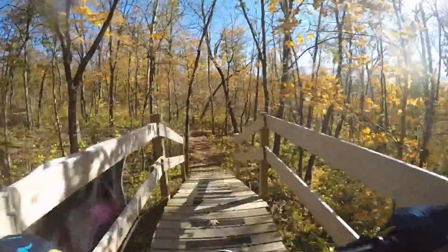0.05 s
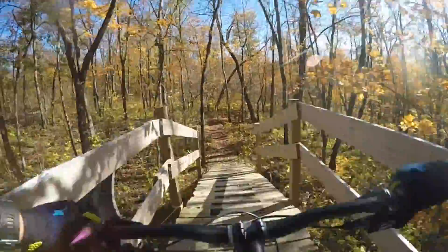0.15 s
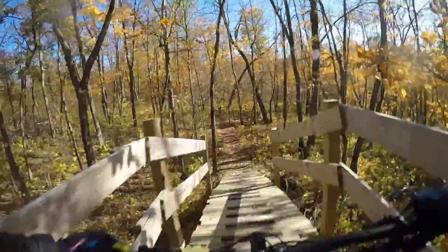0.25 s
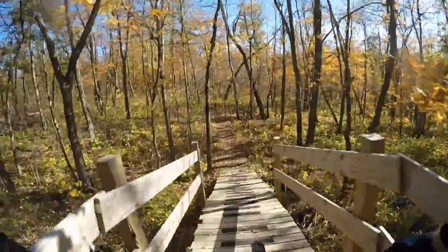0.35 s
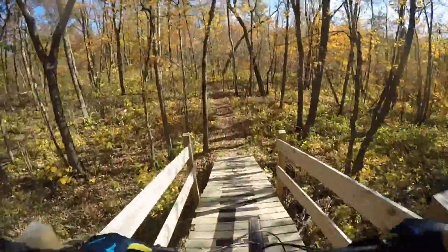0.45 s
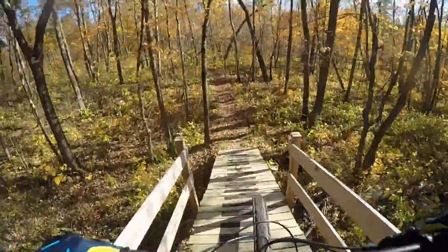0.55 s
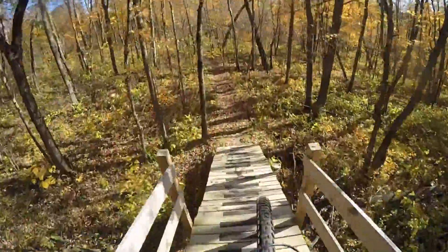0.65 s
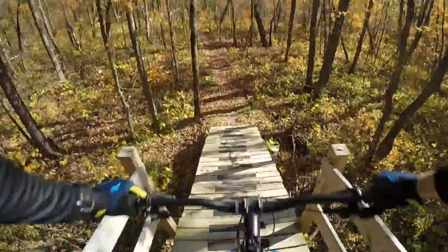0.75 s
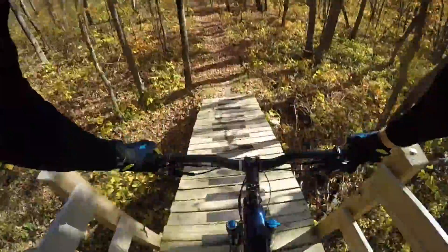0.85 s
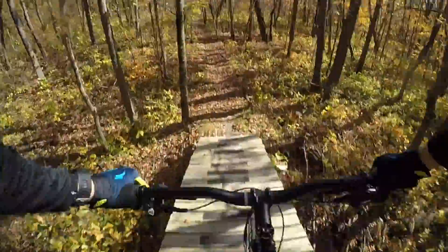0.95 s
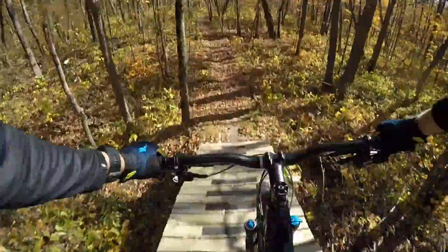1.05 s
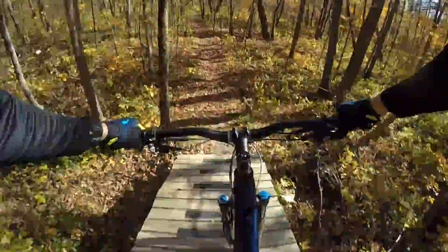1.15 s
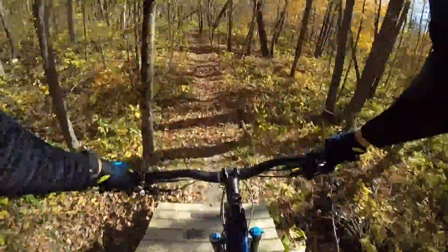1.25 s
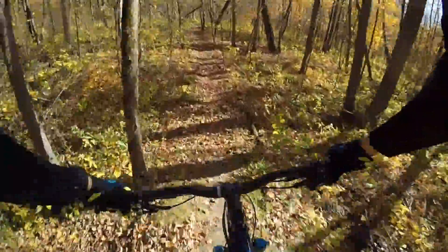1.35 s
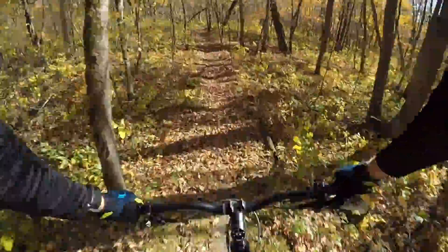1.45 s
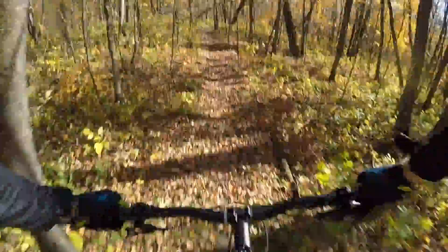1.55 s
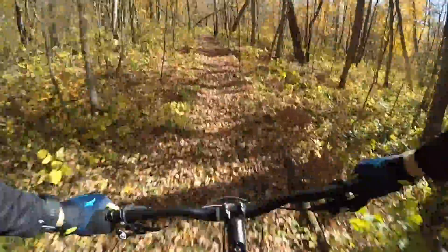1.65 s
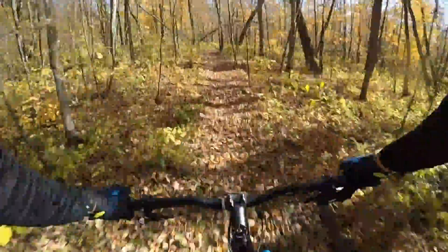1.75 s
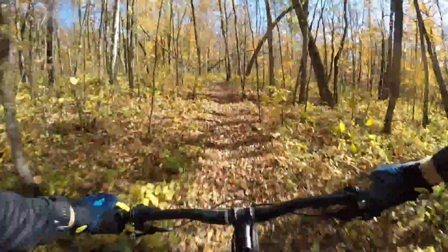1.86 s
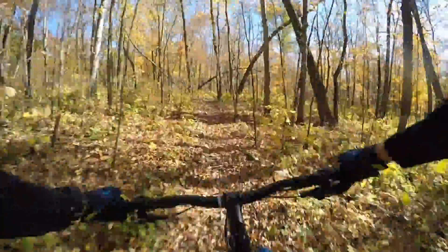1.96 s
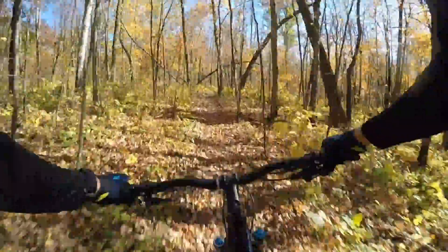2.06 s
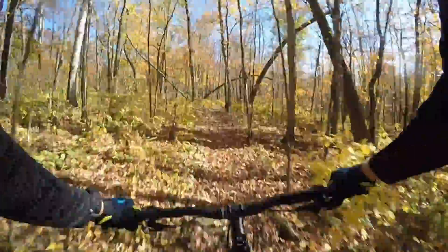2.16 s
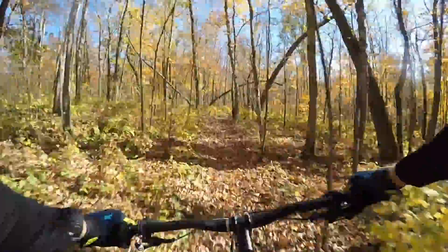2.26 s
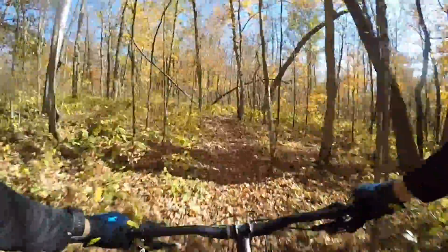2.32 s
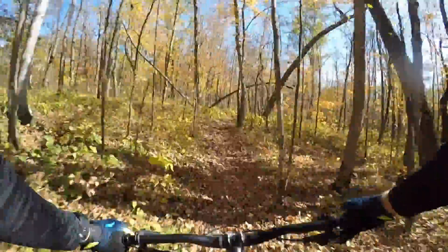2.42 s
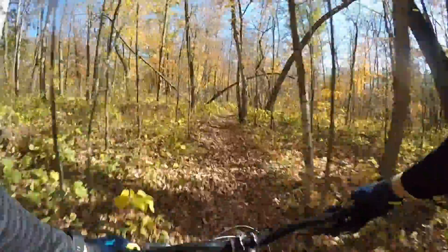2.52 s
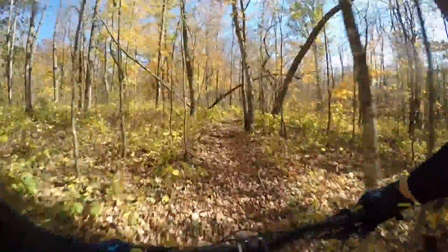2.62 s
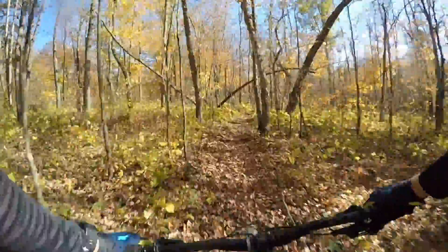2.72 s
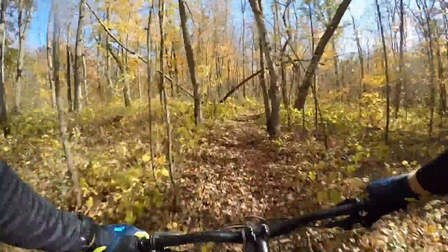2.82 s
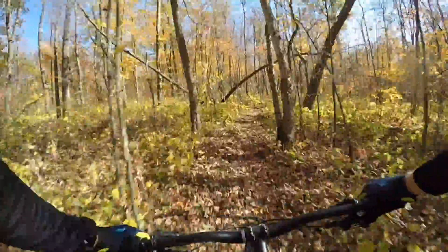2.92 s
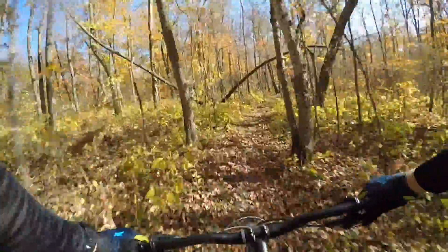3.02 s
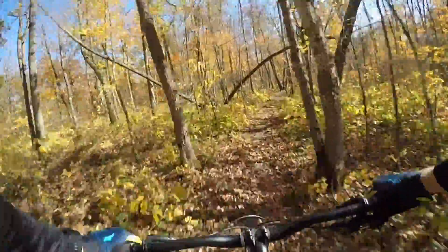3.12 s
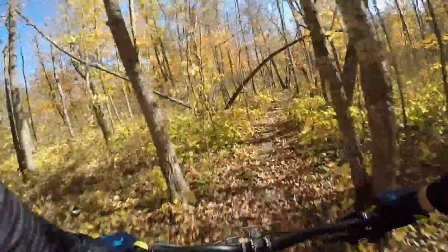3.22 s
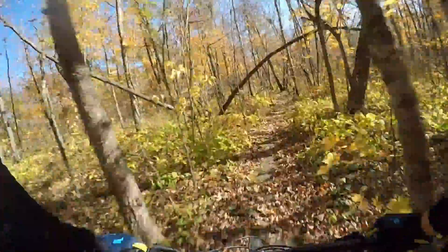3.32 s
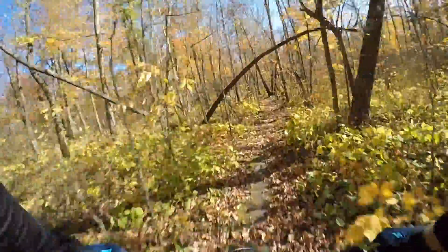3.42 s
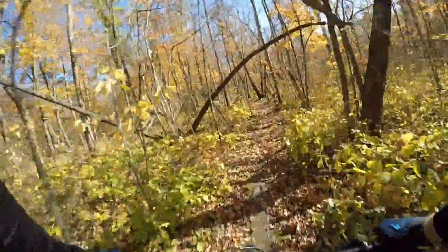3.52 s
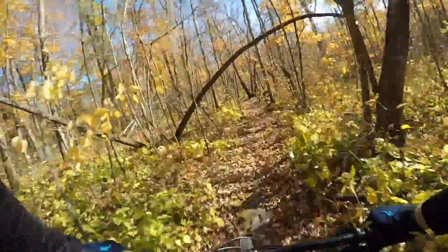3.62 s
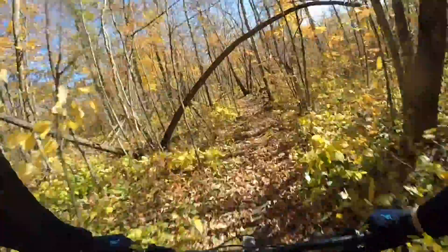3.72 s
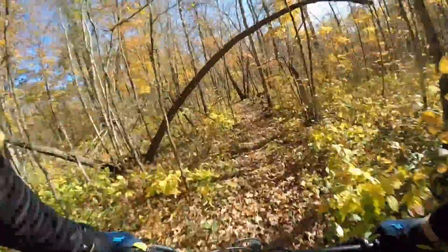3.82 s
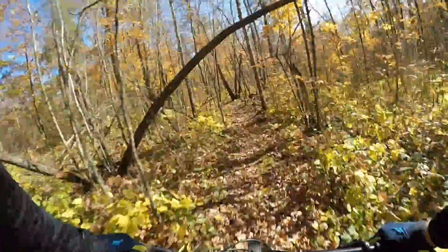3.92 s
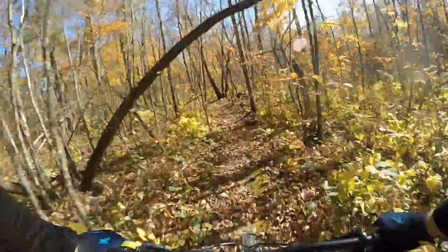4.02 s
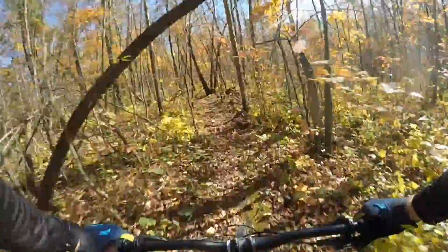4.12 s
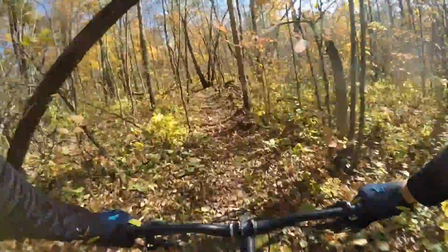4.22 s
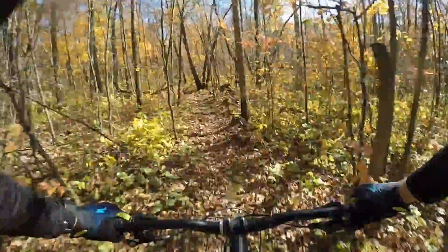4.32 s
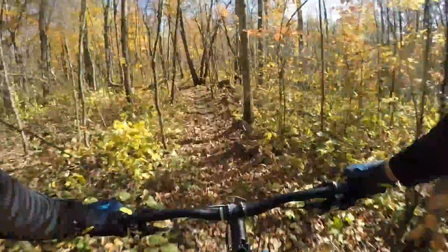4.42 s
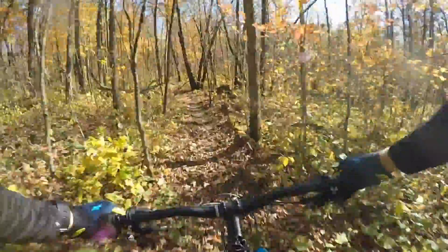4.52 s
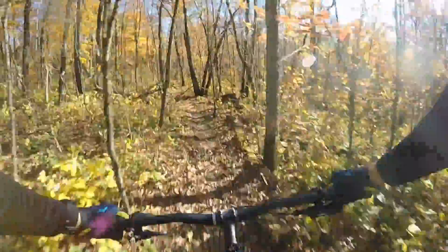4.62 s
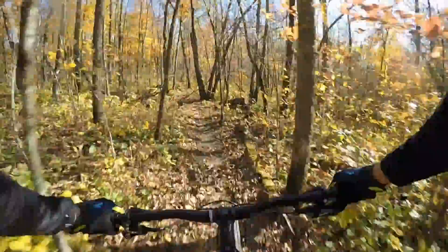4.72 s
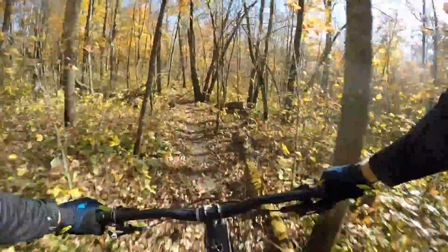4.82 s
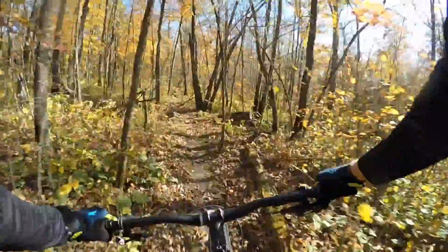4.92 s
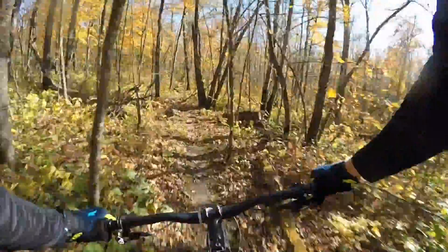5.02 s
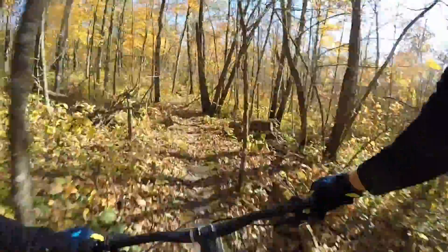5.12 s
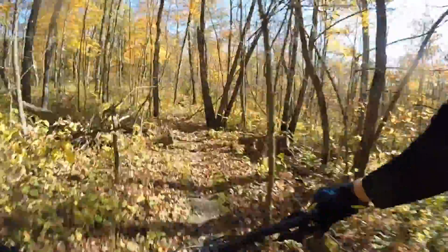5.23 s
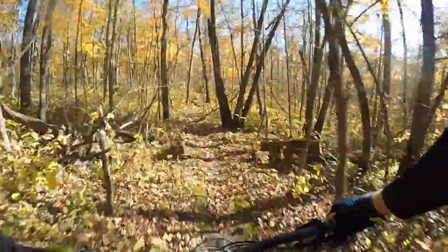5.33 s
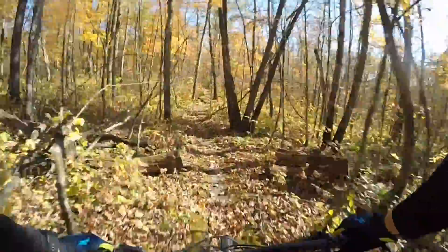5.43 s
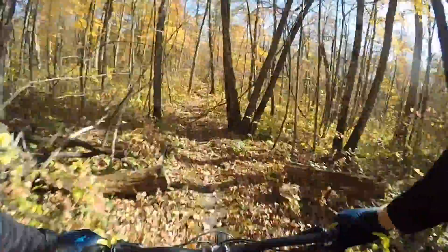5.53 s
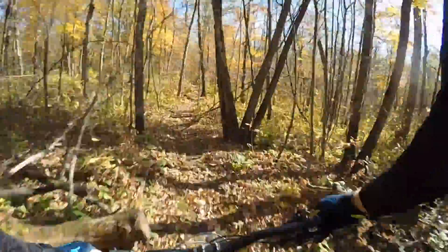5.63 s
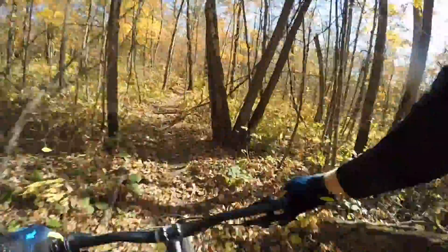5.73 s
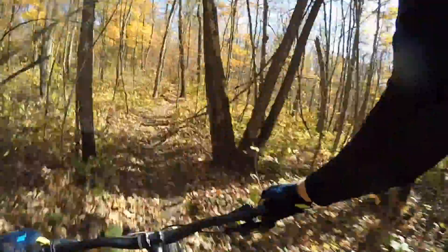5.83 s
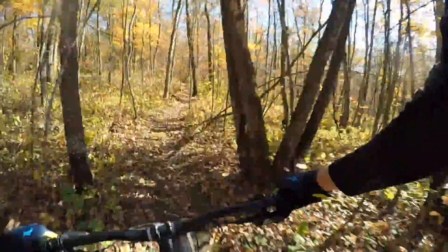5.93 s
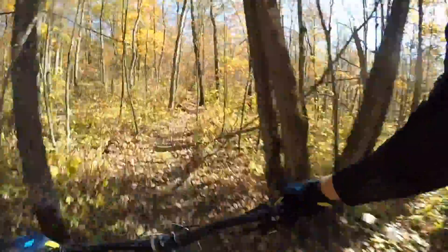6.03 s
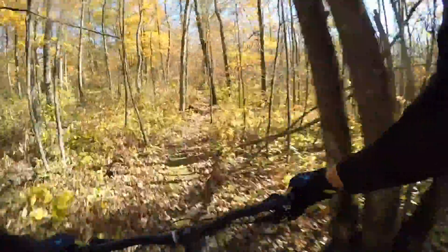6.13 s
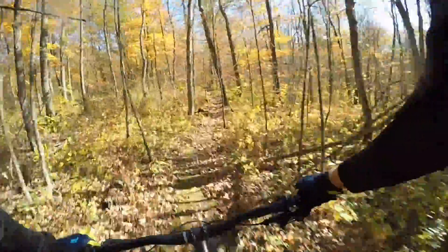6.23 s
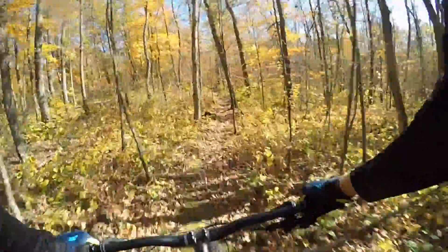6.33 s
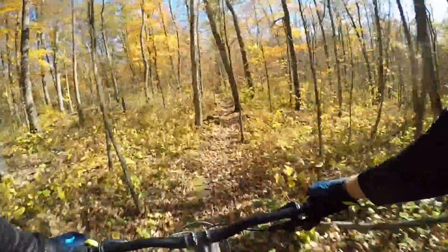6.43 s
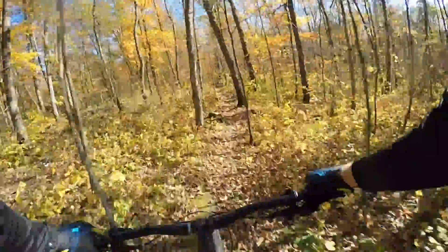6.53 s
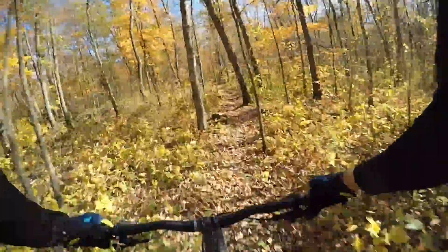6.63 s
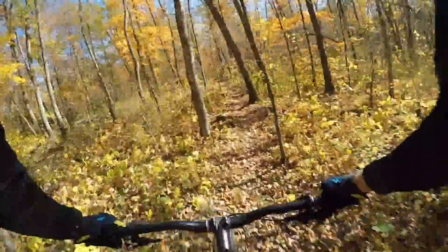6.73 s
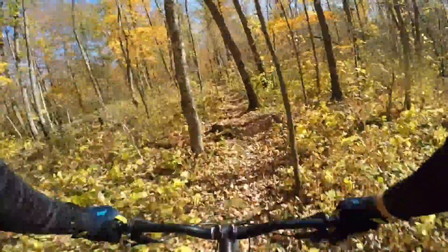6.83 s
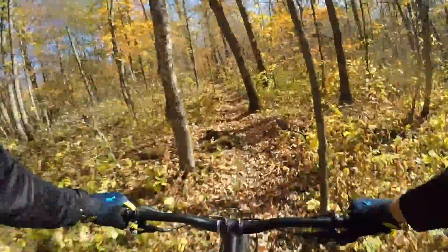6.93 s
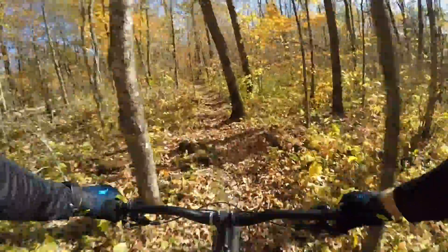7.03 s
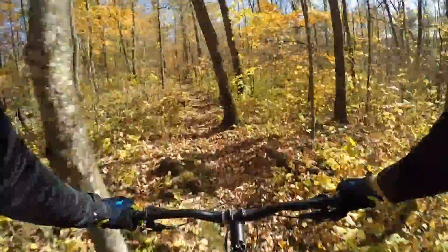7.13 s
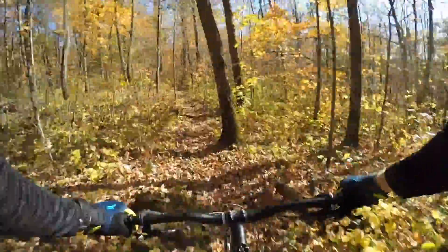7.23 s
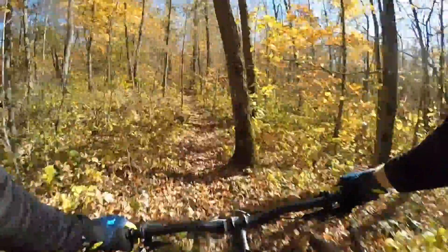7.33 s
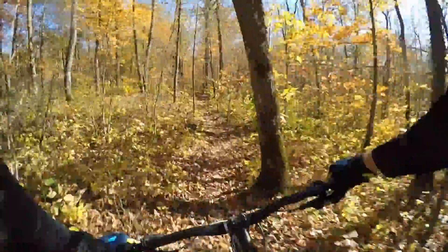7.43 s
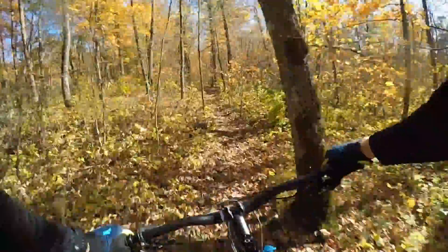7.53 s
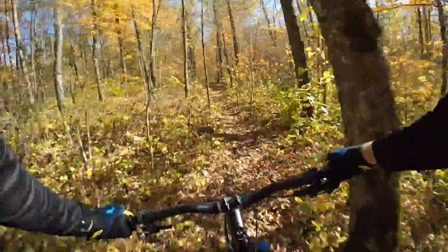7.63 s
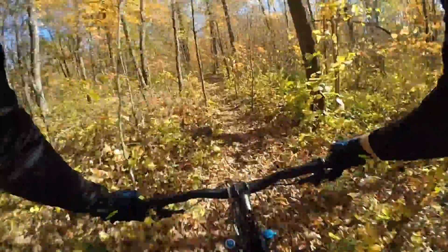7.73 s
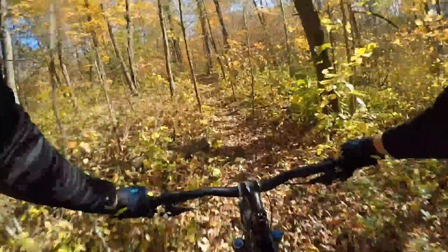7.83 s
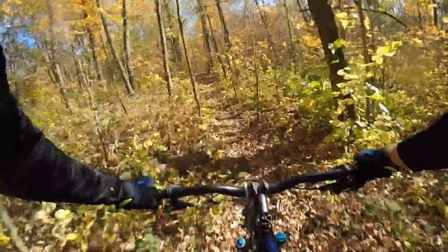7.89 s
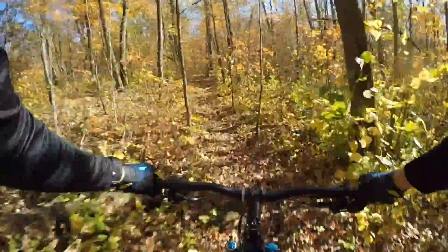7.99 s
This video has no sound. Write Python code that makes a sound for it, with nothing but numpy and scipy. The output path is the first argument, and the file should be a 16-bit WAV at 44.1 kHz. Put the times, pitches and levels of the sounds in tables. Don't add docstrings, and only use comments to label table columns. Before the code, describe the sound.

A mountain bike rattles down a plank ramp with knocks and booms, thuds onto dirt, then crunches steadily through dry leaves.

```python
import sys
import numpy as np
from scipy import signal
from scipy.fft import rfft, irfft
from scipy.io import wavfile
from scipy.ndimage import uniform_filter1d, map_coordinates

SR = 44100
rng = np.random.default_rng(int(sys.argv[2]) if len(sys.argv) > 2 else 0)


def generate_wav(signal):
    frames = np.transpose(np.atleast_2d(signal))
    scaled = np.clip(frames, -1, 1) * 32767
    pcm = np.round(scaled).astype(np.int16)
    wavfile.write(sys.argv[1], SR, pcm)


def gain_from_db(level_db):
    decades = np.asarray(level_db, float) / 20
    return 10 ** decades


N = 355446
HZ = np.fft.rfftfreq(N, 1 / SR)
TIME = np.arange(N) / SR
LANDING_S = 1.67

# pitch_hz, width_hz, level_db
HOUSING_MODES = [(1150, 820, -15), (1718, 260, -4), (1835, 48, -4), (2353, 530, 3.5), (2525, 680, -6),
                 (3423, 510, 2), (3954, 650, 1), (4427, 215, 3.5), (5230, 620, -2.5), (5655, 227, 1),
                 (6260, 840, -8), (6850, 220, -8.5), (7480, 120, -15), (7280, 1820, -13), (8700, 340, -17),
                 (9440, 460, -18.5), (10800, 2050, -21.5), (12600, 1000, -23), (14260, 1150, -24.5)]


def unit(x):
    return x / np.sqrt(np.mean(x ** 2))


def causal(x, gain):
    cepstrum = irfft(np.log(gain + 1e-7), N)
    cepstrum[1:N // 2] *= 2
    cepstrum[N // 2 + 1:] = 0
    return irfft(rfft(x) * np.exp(rfft(cepstrum)), N)


def peaks(modes):
    power = 0
    for hz, width, db in modes:
        power = power + (gain_from_db(db) / (1 + (2 * (HZ - hz) / width) ** 2)) ** 2
    return np.sqrt(power)


def shaped(points, push):
    hz, db = np.transpose(points)
    return unit(causal(push, gain_from_db(np.interp(np.log(HZ + 1), np.log(hz), db, -80, -80))))


def walk(rate):
    hold = int(SR / rate)
    steps = np.repeat(rng.standard_normal(3000), hold)[:N]
    return unit(uniform_filter1d(steps, hold))


def curve(table):
    s, level = np.transpose(table)
    return np.interp(TIME, s, level)


def add(out, s, shape):
    i = max(int(s * SR), 0)
    out[i:i + len(shape)] += shape[:N - i]


def crackle(per_second, spread_db):
    hits = rng.random(N) < per_second / SR
    size_db = spread_db * np.minimum(rng.exponential(size=N), 4)
    return unit(hits * rng.standard_normal(N) * gain_from_db(size_db))


def steady(x, seconds):
    return unit(x / np.sqrt(uniform_filter1d(x ** 2, int(seconds * SR)) + 0.082))


def ping(out, s, db, hz, t60):
    t = TIME[:SR // 16]
    add(out, s, np.minimum(t / 0.00055, 1) * gain_from_db(db - 60 * t / t60) * np.sin(2 * np.pi * hz * t))


def bright_cracks(moments):
    burst, t = np.zeros(N), TIME[:SR // 16]
    for s, db in moments:
        add(burst, s, gain_from_db(db - 60 * t / 0.034))
    colour = peaks([(5650, 960, 0), (6860, 1500, -4), (9700, 3600, -13), (13000, 3000, -14)])
    return causal(burst * rng.standard_normal(N), unit(colour))


def swing(hz, half, lean):
    t = TIME[:SR // 5] - .1
    return -np.exp(-(t / half) ** 2) * np.cos(2 * np.pi * hz * t + lean)


def bare_patches():
    # start_s, length_s, change_db
    patches = [(7.749, 0.019, 6), (7.903, 0.094, -3), (5.1, 0.072, 1), (5.29, 0.047, -3), (2.03, 0.035, -3),
               (2.29, 0.043, -0.5), (3.061, 0.065, -5), (3.214, 0.13, -3.5), (3.476, 0.07, -2.5),
               (3.657, 0.33, -9.5), (3.873, 0.077, -6), (4.195, 0.038, -4.5), (4.494, 0.035, -10),
               (4.559, 0.11, -5), (4.789, 0.018, 6), (5.373, 0.2, -0.5), (5.77, .07, -0.5),
               (5.956, 0.036, -7), (6.08, 0.082, -2), (6.417, 0.045, -5.5), (6.49, 0.14, -9),
               (6.74, 0.039, -12.5), (6.771, 0.067, -6), (5.485, 0.063, -7), (6.97, 0.14, -2.5),
               (7.218, 0.089, -4.5), (7.48, 0.057, -3.5), (7.659, 0.05, -5.5), (7.854, 0.045, -7.5),
               (8.023, 0.038, -8)]
    leave_s, reentry_s = 0.021, 0.015
    change_db = np.zeros(N)
    for s, length, db in patches:
        t = TIME[:int(length * SR)]
        add(change_db, s, db * np.clip(np.minimum(t / leave_s, (length - t) / reentry_s), 0, 1))
    return change_db


def leaf_heaps():
    # start_s, level_db, held_s
    heap_table = [(1.542, -37, 0.029), (.858, -49, 0.018), (1.172, -45, 0.015), (1.682, -31, 0.015),
                  (1.555, -45, 0.025), (3.4, -37, 0.04), (4.29, -37.5, 0.018), (1.778, -34, 0.022),
                  (1.811, -31.5, 0.014), (4.705, -38.5, 0.011), (4.826, -40.5, .008), (4.882, -37, 0.01),
                  (4.94, -40, .015), (4.755, -49.5, 0.029), (7.62, -43, 0.037), (3.145, -37.5, 0.023),
                  (3.033, -36, 0.011), (2.87, -44.5, 0.013), (2.394, -34, 0.011), (2.56, -36, .02),
                  (3.088, -34, 0.012), (3.2, -37, .006), (3.44, -36, 0.01), (3.59, -34, 0.031),
                  (3.718, -39.5, 0.026), (3.79, -38.5, 0.023), (4.11, -36, 0.0088), (4.67, -39.5, 0.037),
                  (4.855, -42, 0.079), (5.0, -39, 0.0055), (5.06, -37, 0.022), (5.17, -43, 0.021),
                  (5.25, -37, 0.0041), (5.35, -42, 0.014), (5.692, -34, 0.0032), (5.86, -39.5, 0.02),
                  (6.16, -39.5, 0.034), (6.248, -39, 0.041), (6.644, -36, 0.011), (6.709, -34.5, 0.016),
                  (7.4, -34, 0.011), (7.12, -38.5, 0.039), (7.354, -35.5, 0.027), (7.54, -37, 0.018),
                  (7.995, -46, 0.015)]
    # start_s, level_db
    clump_table = [(6.776, -45), (.27, -45), (.44, -42.5), (.93, -45), (1.41, -46), (1.867, -32),
                   (1.958, -35), (2.12, -33.5), (2.235, -36), (2.486, -33.5), (2.62, -44), (2.971, -34.5),
                   (3.2035, -38), (3.36, -37), (3.946, -60), (3.988, -48), (4.356, -49), (4.415, -36),
                   (4.517, -41), (4.913, -54), (5.292, -44), (5.55, -41), (5.575, -37), (5.63, -34.5),
                   (5.729, -40), (5.92, -44), (5.99, -38), (6.457, -40), (6.874, -37), (7.721, -34.5)]
    events = [(s, db, held, 0.0021 + 0.13 * held) for s, db, held in heap_table]
    events += [(s, db, 0.0016, 0.003) for s, db in clump_table]
    power, t, fade_t60_s = np.zeros(N), TIME[:SR // 6], 0.089
    for s, db, held, rise in events:
        fade_db = 60 * np.maximum(t - rise - held, 0) / fade_t60_s
        add(power, s, np.minimum(t / rise, 1) * gain_from_db(db - fade_db) ** 2)
    return power


def leaves():
    # start_s, crackle_db
    litter = [(0.0, -47.5), (0.18, -56), (0.3, -45.5), (0.6, -53.5), (0.88, -53.5), (1.12, -47),
              (1.35, -54), (1.66, -48), (1.72, -37), (2.4, -36.5), (3.6, -37), (4.2, -37.5), (4.9, -44),
              (5.5, -48.5), (5.58, -40), (6.5, -42), (6.9, -36.5), (8.06, -34.5)]
    litter_db, bare_db, heaps = curve(litter), bare_patches(), leaf_heaps()
    bed = gain_from_db(litter_db + bare_db + 0.12 * walk(30) + 1.06 * walk(90)) ** 2

    on_dirt = np.clip((TIME - LANDING_S) / 0.12 + 1, 0, 1)
    plank_sheen_db, leaf_sheen_db = -13.5, -8.5
    bright_db = plank_sheen_db + (leaf_sheen_db - plank_sheen_db) * on_dirt
    bright_db = bright_db + 0.06 * bare_db + 0.05 * (litter_db + 42.5) * on_dirt

    fine = crackle(per_second=10000, spread_db=-0.04)
    coarse = crackle(per_second=2500, spread_db=1.0)
    spectrum = rfft(causal(fine + gain_from_db(-13.5) * coarse, peaks(HOUSING_MODES)))
    top = 1 / (1 + (6500 / (HZ + 1)) ** 8)

    body, edges = 0, [0, 1500, 2050, 2450, 2950, 3750, 4200, 4800, 5400, SR]
    for lo, hi in zip(edges, edges[1:]):
        dull_db = -7.5 * (1 - on_dirt) * np.clip((hi - 4200) / 1600, 0, 1)
        band = irfft(spectrum * (1 - top) * (HZ >= lo) * (HZ < hi), N)
        body = body + band * gain_from_db(dull_db + 1.23 * walk(200) + 0.74 * walk(25))
    drift = np.cumsum(.013 * walk(35))
    body = map_coordinates(body, [np.arange(N) + drift], mode="mirror")

    under = 1 / (1 + (HZ / 8500) ** 8)
    over = 1 / (1 + (12000 / (HZ + 1)) ** 8)
    sheen = 0
    for share in (under, 1 - under - over, over):
        flicker_db = (0.7 + 2.2 * (1 - on_dirt)) * walk(40)
        sheen = sheen + irfft(spectrum * top * share, N) * gain_from_db(flicker_db)
    sheen = unit(sheen) * gain_from_db(bright_db + 0.32)
    heap_sheen = heaps * gain_from_db(-0.5) ** 2
    return np.sqrt(bed + heaps) * unit(body) + np.sqrt(bed + heap_sheen) * sheen


def drone(load_db):
    # pitch_hz, level_db (per Hz)
    spectrum = [(120, -40), (200, -1), (240, -4.5), (310, 2), (380, -5.5), (700, -7), (1000, -14),
                (1600, -9), (4000, -19.5), (15000, -54)]
    boom_db = 19 * gain_from_db(-60 * TIME / 0.43)
    return shaped(spectrum, rng.standard_normal(N)) * gain_from_db(-54 + load_db + boom_db + 1.36 * walk(25))


def strap_sway(bumps):
    # pitch_hz, level_db (per Hz)
    spectrum = [(7, -14), (14, -3), (24, 0), (38, -4), (55, -13), (75, -26), (110, -50)]
    # start_s, jolt_db
    jolts = [(0.0, -24.5), (0.45, -17.5), (0.95, -20.5), (1.1, -18.5), (1.25, -24), (1.45, -29.5),
             (1.7, -15.5), (1.85, -22.5), (2.55, -24), (2.9, -34), (3.4, -21.5), (3.85, -29.5),
             (4.7, -24.5), (5.5, -28.5), (5.9, -23.5), (6.4, -29), (6.9, -21), (7.5, -29), (8.06, -30)]
    return steady(shaped(spectrum, bumps), .09) * gain_from_db(curve(jolts) - 1.5)


def frame_rumble(bumps, load_db):
    # pitch_hz, level_db (per Hz)
    spectrum = [(35, -44), (55, -4), (80, 2.5), (120, -2.5), (170, -11), (230, -26.5)]
    return steady(shaped(spectrum, bumps), 0.22) * gain_from_db(-45.5 + 1.32 * load_db)


def grit():
    amount = np.interp(TIME, [0, .45, 1.1, LANDING_S], [0.21, 1, 0.4, 0.67])
    specks = crackle(per_second=1000, spread_db=3.0) * amount * gain_from_db(3.0 * walk(30))
    return gain_from_db(-67.5) * causal(specks, unit(peaks([(10800, 1300, -1), (12900, 1800, -6)])))


def mount_rings():
    # start_s, peak_db, pitch_hz, t60_s
    ring_table = [(1.073, -27, 3300, .03), (1.0725, -26, 1900, .012), (1.095, -32, 3300, .03),
                  (1.104, -38, 4400, .04), (1.133, -32, 4300, .02), (1.134, -33, 2300, .025),
                  (1.134, -36, 1700, .03), (1.117, -38, 2300, .03), (1.100, -36, 2300, .015),
                  (1.083, -33, 2250, .02), (1.09, -35, 2300, .015), (1.057, -36, 2800, .015),
                  (.265, -41, 4450, .06), (.2865, -24, 1550, .015), (.470, -38, 2450, .09),
                  (.416, -38, 3350, .02), (.296, -48, 6400, .03), (3.012, -28, 1400, .012),
                  (1.700, -27, 1150, .015), (.004, -40, 650, .08), (.868, -38, 1400, .03),
                  (.857, -41, 1600, .02), (.698, -39, 1500, .03), (.84, -41, 3600, .03),
                  (.965, -41, 6900, .02), (1.181, -38, 1250, .02), (1.19, -39, 1500, .02),
                  (1.183, -39, 3700, .03), (1.162, -38, 2300, .02), (.290, -28, 2200, .02),
                  (.937, -42, 7100, .02), (1.686, -27, 2900, .015)]
    out = np.zeros(N)
    for s, db, hz, t60 in ring_table:
        ping(out, s, db, hz, t60)
    return out


def knocks():
    # start_s, peak_db, pitch_hz, t60_s
    knock_table = [(.2893, -11, 65, .04), (1.0762, -7, 80, .03), (1.7002, -1, 58, .035),
                   (.012, -28, 200, .04), (.2865, -15, 300, .03), (.2875, -26, 750, .012),
                   (.289, -22, 470, .03), (1.0765, -23, 330, .025), (1.7005, -19, 110, .03),
                   (.42, -24, 80, .06), (.820, -30, 300, .02), (.913, -24, 200, .02),
                   (.958, -24, 700, .012), (1.069, -29, 500, .012), (1.204, -26, 80, .06),
                   (1.0745, -20, 500, .02), (1.6985, -22, 560, .014), (1.712, -36, 700, .01),
                   (1.077, -22, 640, .025), (1.067, -31, 900, .012), (1.648, -34, 500, .012),
                   (1.598, -22, 180, .03), (1.81, -27, 150, .03), (2.155, -34, 550, .012),
                   (4.494, -35, 450, .012), (4.5, -30, 150, .03), (4.626, -32, 850, .012),
                   (4.628, -36, 250, .02), (6.848, -35, 300, .012), (7.26, -36, 600, .01)]
    out, shudder, t = np.zeros(N), np.zeros(N), TIME[:SR // 8]
    for s, db, hz, t60 in knock_table:
        turns = hz * t + .55 * (1 - np.exp(-t * hz / .55))
        add(out, s, -gain_from_db(db - 60 * t / t60) * np.sin(2 * np.pi * turns))
        shudder_db = np.minimum(db, -14) - 12 - 9 * (hz < 160)
        add(shudder, s, gain_from_db(shudder_db - 60 * t / 0.02))
    wood = peaks([(453, 1400, -9), (700, 430, 7.0), (1520, 2900, -8.5)])
    return out + causal(shudder * crackle(per_second=11000, spread_db=5.0), unit(wood))


def grit_ticks():
    # start_s, peak_db
    tick_table = [(0.0328, -41), (0.0747, -42.5), (0.1974, -54), (0.2668, -47), (0.3641, -49), (0.388, -44),
                  (0.5147, -51), (0.5352, -54), (0.6799, -52), (0.9268, -47), (0.9373, -42), (0.9652, -42),
                  (1.0286, -45), (1.052, -48), (1.0999, -43), (1.1657, -53), (1.279, -48), (1.3538, -46),
                  (1.6067, -43)]
    return bright_cracks([(s, db - 4.5) for s, db in tick_table])


def taps():
    # start_s, peak_db, ring_hz, rattle_db (beside the peak)
    tap_table = [(0.1212, -42.5, 1770, 4), (.2862, -36, 4200, -20), (0.2856, -8, 2450, -16.5),
                 (0.6903, -37.5, 3440, 6), (0.7562, -23.5, 1630, -12), (0.8054, -20.5, 2670, -16),
                 (0.8193, -25.5, 1340, -47), (0.9105, -15, 2400, -18), (0.921, -34, 1500, 6),
                 (.928, -37, 1300, 5.5), (0.9566, -13, 2370, -21), (1.0298, -31, 2400, -21),
                 (1.053, -27.5, 2700, -10), (1.073, -20, 2490, -5.5), (1.206, -31, 1230, -4),
                 (1.4122, -51, 1150, -2), (1.5974, -18, 2400, -13.5), (1.6845, -29, 2170, -2),
                 (2.0183, -22.5, 2070, -9), (3.0124, -12.5, 2250, -25), (3.1232, -22, 2216, -24),
                 (4.626, -27, 1360, -27), (5.255, -43, 2460, -15), (7.259, -32, 1210, -9),
                 (6.848, -33, 1280, -3), (4.496, -47, 1230, -6), (2.155, -29, 1190, -7)]
    out, rattle, t = np.zeros(N), np.zeros(N), TIME[:SR // 20]
    for s, db, hz, rattle_db in tap_table:
        ring = np.sin(2 * np.pi * hz * t) * np.minimum(.6 + t / .003, 1)
        add(out, s + .0003, gain_from_db(db - 1.5) / (1 + (t / .0017) ** 6) * ring)
        fade = 0.22 * gain_from_db(-60 * t / 0.31) + 0.47 * gain_from_db(-60 * t / 0.033)
        add(rattle, s, gain_from_db(db + rattle_db) * fade)
    dull = (peaks(HOUSING_MODES) + 1.13 / (1 + (HZ / 1600) ** 4)) / (1 + (HZ / 4600) ** 6)
    rattle = causal(rattle * crackle(per_second=12000, spread_db=0.0), unit(dull))
    return causal(out, 1 / (1 + (HZ / 6000) ** 3)) + rattle


def lurches():
    # start_s, level_db, pitch_hz, half_length_s
    lurch_table = [(0.2, -12.5, 33.8, 0.015), (0.253, -14, 25, 0.027), (0.29, -16, 25, 0.021),
                   (0.461, -9, 38, 0.04), (0.527, -6, 27, 0.019), (0.662, -11.5, 23.8, 0.022),
                   (0.737, -4, 27, 0.038), (0.916, -6, 26, 0.012), (0.967, -3, 28.6, 0.031),
                   (1.106, -21, 33.2, 0.015), (1.145, -12, 25.5, 0.033), (1.236, -13, 29.7, 0.024),
                   (1.399, -13.5, 33, 0.016), (1.58, -3, 28, 0.023), (1.635, -4, 25.8, 0.022),
                   (1.74, -3.5, 25.2, 0.017), (1.834, -10.5, 23.7, 0.038), (1.97, -11.5, 23, 0.022),
                   (3.396, -18, 24.4, 0.044), (4.506, -13.5, 29.2, 0.027), (4.571, -15, 40, 0.0044),
                   (5.744, -12, 23.8, 0.025), (6.818, -18, 37, 0.044), (6.971, -12, 22, 0.018),
                   (7.921, -15.5, 22.6, 0.044)]
    out = np.zeros(N)
    for s, db, hz, half in lurch_table:
        add(out, s - .1, gain_from_db(db) * swing(hz, half, 0))
    return out


def squeak():
    # (pitch_hz, width_hz, level_db)
    rub = (0.022, -45.5, [(6430, 520, -5), (5650, 200, -3), (8200, 1400, -22)])
    length, db, modes = rub
    start_s = .438
    gate = np.clip((TIME - start_s) / 0.0031, 0, 1)
    gate = gate * np.clip((start_s + length - TIME) / 0.015 + 1, 0, 1)
    return gain_from_db(db) * gate * unit(causal(rng.standard_normal(N), peaks(modes)))


def twigs():
    # start_s, peak_db
    twig_table = [(1.414, -35), (.58, -54), (0.627, -39), (.698, -38), (.759, -38), (0.933, -40),
                  (0.803, -35), (1.133, -29), (1.547, -23), (3.0115, -15), (3.31, -31), (3.989, -34),
                  (4.357, -28), (5.257, -24), (5.55, -33), (6.777, -30), (3.947, -49), (5.729, -31),
                  (6.276, -32), (6.830, -43)]
    # start_s, peak_db
    split_table = [
        (3.0117, -23),
        (.8045, -43),
        (.6265, -45),
        (1.1335, -48),
        (1.547, -42),
        (.699, -52),
        (1.055, -52),
        (1.279, -52),
    ]
    burst, split, t = np.zeros(N), np.zeros(N), TIME[:SR // 50]
    for s, db in twig_table:
        add(burst, s, gain_from_db(db - 7) / (1 + (t / .0022) ** 3))
    for s, db in split_table:
        add(split, s, gain_from_db(db) / (1 + (t / 0.0017) ** 4))
    bright = 1 / (1 + (9000 / (HZ + 1)) ** 4)
    colour = peaks(HOUSING_MODES) * (1.1 + HZ / 3000) + 0.18 / (1 + (HZ / 14000) ** 6)
    splinters = causal(burst * rng.standard_normal(N), unit(colour))
    return causal(split * rng.standard_normal(N), bright) + splinters


def leaf_snaps():
    # start_s, peak_db, pitch_hz
    snap_table = [(1.7833, -16, 2300), (2.1196, -29, 2600), (2.395, -20, 2290), (2.4573, -29, 4500),
                  (2.4862, -23, 2230), (2.538, -17, 4400), (3.0889, -25, 2500), (3.2035, -18, 2500),
                  (3.3088, -12, 2450), (3.4504, -10, 3960), (3.9464, -24, 2370), (3.9878, -38, 3550),
                  (4.0976, -30, 3900), (4.117, -19, 3460), (4.2448, -21, 3960), (4.3572, -18, 4200),
                  (4.4149, -24, 2530), (4.6648, -27, 2250), (4.9127, -23, 2300), (5.003, -21, 4450),
                  (5.0584, -27, 3760), (5.0729, -24, 2290), (5.257, -37, 2370), (5.2919, -29, 2280),
                  (5.534, -29, 3420), (5.5503, -22, 3854), (5.5732, -19, 3340), (5.6974, -19, 2350),
                  (5.73, -27, 2400), (5.8493, -22, 2460), (5.8702, -15, 3840), (5.9203, -16.5, 3470),
                  (5.9943, -22, 4520), (6.1669, -18, 2300), (6.2514, -16, 3360), (6.2766, -14.5, 2250),
                  (6.6479, -19, 2470), (6.6797, -21, 2390), (6.7176, -25, 2500), (6.7765, -27, 2340),
                  (6.8304, -17, 2480), (7.123, -13, 2500), (7.3008, -20, 3330), (7.439, -14, 2480),
                  (7.7124, -24, 3590), (7.7917, -19, 3280), (7.888, -22, 2300), (7.9987, -15, 2370)]
    out, level_db = np.zeros(N), -11.5
    for s, db, hz in snap_table:
        ping(out, s, db + level_db, hz, 0.035)
    return out + bright_cracks([(s, db + level_db - 16) for s, db, _ in snap_table])


def pulse():
    # start_s, level_db
    beats = [(2.186, -13.5), (2.576, -12.5), (2.972, -12.5), (3.364, -13), (3.752, -11), (4.144, -9.5),
             (4.541, -11), (4.93, -11), (5.318, -10.5), (5.709, -12.5), (6.105, -12), (6.487, -10),
             (6.878, -11), (7.279, -11), (7.663, -13), (8.0535, -9.5)]
    out = np.zeros(N)
    for s, db in beats:
        add(out, s - .095, gain_from_db(db + 2) * swing(34, .018, 1.05))
        add(out, s - .102, gain_from_db(db - 16.5) * swing(83, 0.013, -1.3))
        add(out, s - .106, gain_from_db(db - 29) * swing(139, .006, 0))
        add(out, s - .064, gain_from_db(db - 7.0) * swing(59.0, 0.007, 0.32))
    return out


def scene():
    # start_s, load_db
    load = [(0.0, 1), (0.2, 1), (0.43, 7.5), (0.8, -1.5), (1.0, 8), (1.35, 2.5), (1.62, 10.5), (1.95, 4.5),
            (3.4, 0.5), (4.55, 0.5), (5.5, 0), (6.0, 3), (6.6, -2.5), (6.9, 1.5), (7.4, -5), (7.9, 0),
            (8.06, -8)]
    load_db = curve(load)
    bumps = crackle(per_second=160, spread_db=.8)
    ground = leaves() + drone(load_db) + grit() + grit_ticks() + twigs() + leaf_snaps()
    bike = frame_rumble(bumps, load_db) + knocks()
    mount = strap_sway(bumps) + mount_rings() + taps() + lurches() + squeak() + pulse()
    return (ground + bike + mount)[None]


def roll_off(x):
    return signal.sosfilt(signal.butter(12, 15530, fs=SR, output="sos"), x)


def record(dry):
    cut = signal.ellip(10, .3, 60, 15350, fs=SR, output="sos")
    mix = signal.sosfilt(cut, dry)
    return roll_off(mix)


dry = scene()
out = record(dry)
generate_wav(out)
```